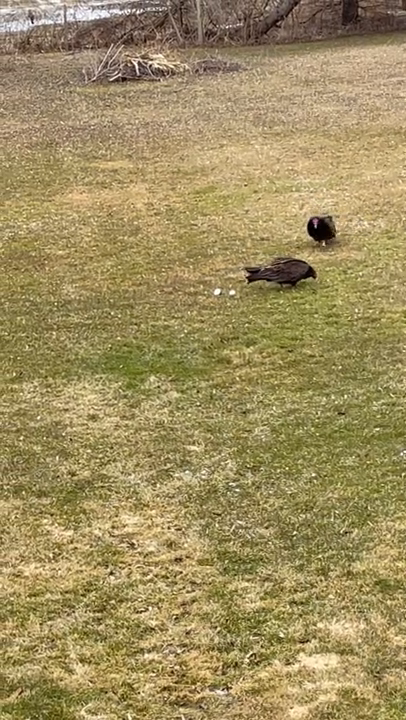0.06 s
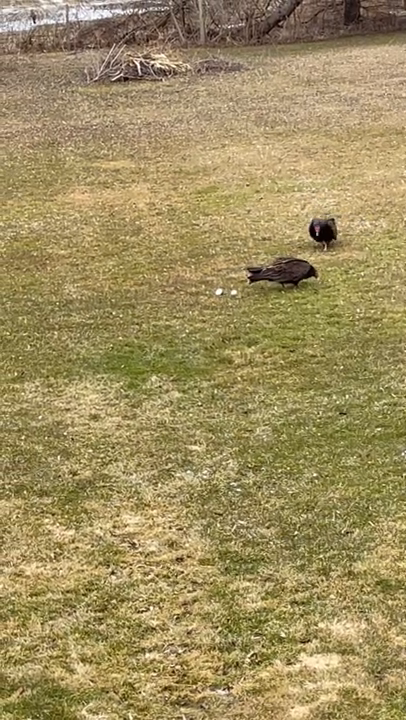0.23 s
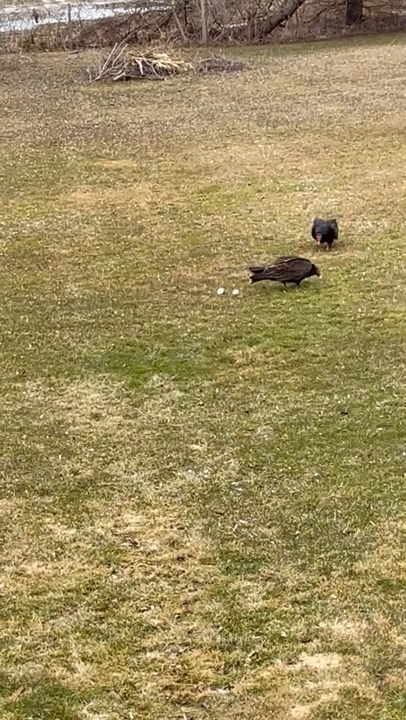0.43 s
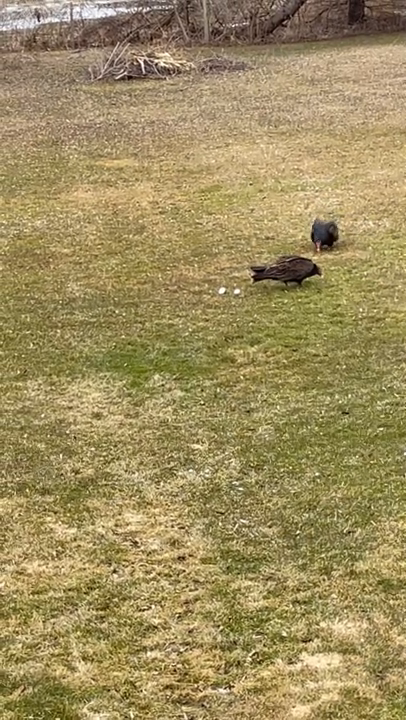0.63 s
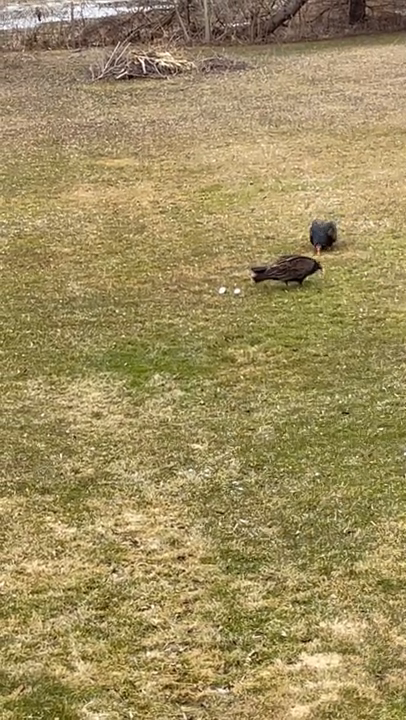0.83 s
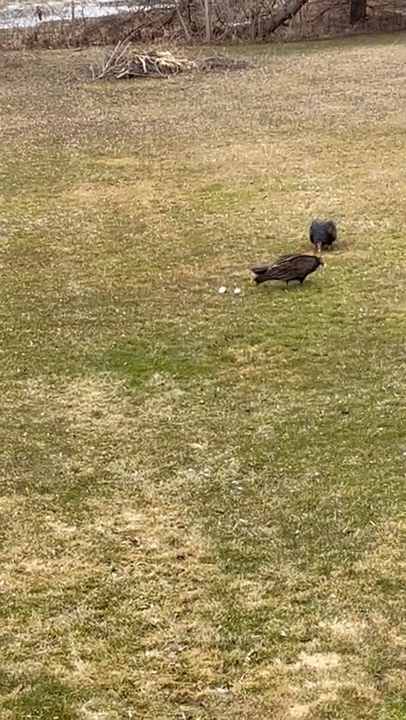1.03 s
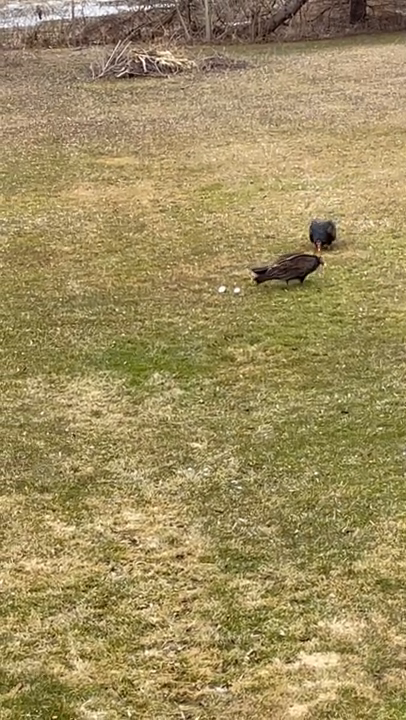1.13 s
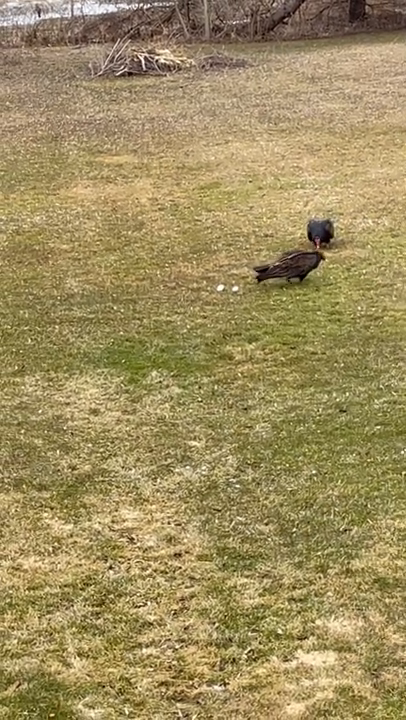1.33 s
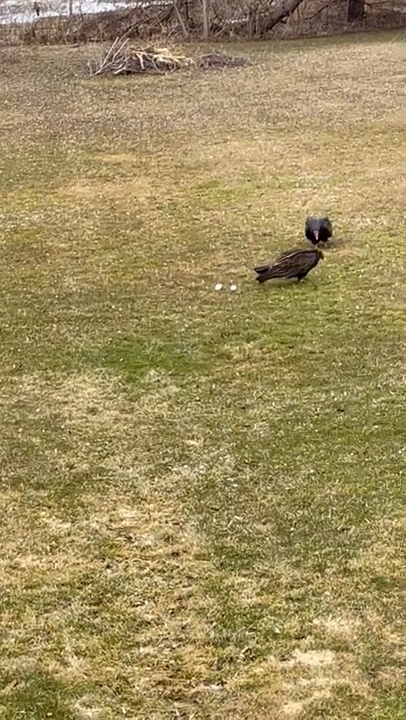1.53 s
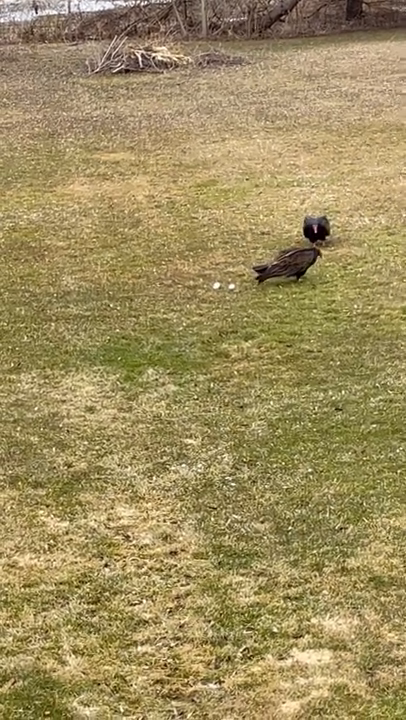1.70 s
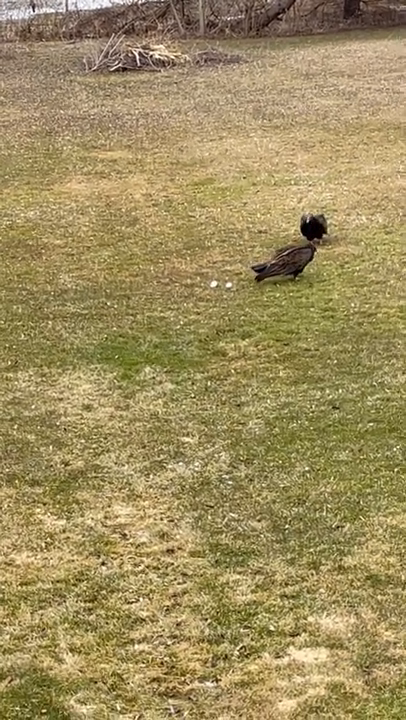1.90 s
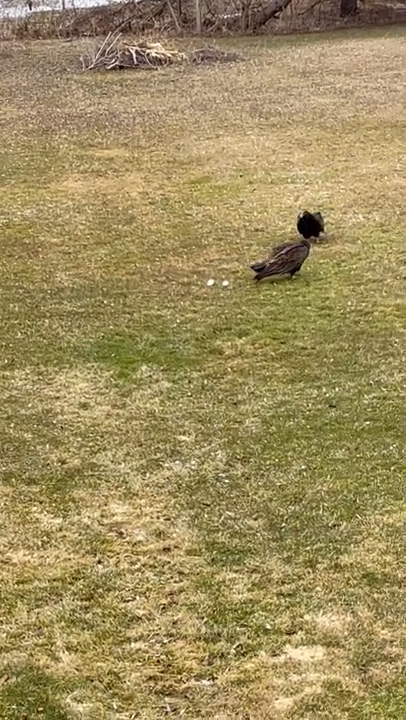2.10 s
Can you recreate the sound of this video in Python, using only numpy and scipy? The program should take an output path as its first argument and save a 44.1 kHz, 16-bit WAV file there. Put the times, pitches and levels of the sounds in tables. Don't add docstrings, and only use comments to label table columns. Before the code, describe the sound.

Wind rumble on a hand-held stereo microphone over an open lawn: light low flutter at first, crowded heavy thumps from 0.4 to 0.9 seconds, strongest near 0.7, fading by 1.1. A soft distant roar of wind in bare trees runs throughout over very faint hiss. Two soft dull taps come at 1.17 and 1.29, with faint cloth rubbing and tiny ticks, the rustle returning from 1.48 to the end.

```python
import sys
import numpy as np
from scipy import signal
from scipy.fft import rfft, irfft, next_fast_len
from scipy.io import wavfile
from scipy.ndimage import uniform_filter1d

SR = 44100
rng = np.random.default_rng(int(sys.argv[2]) if len(sys.argv) > 2 else 0)


def makeup_ratio(level_db):
    decades = np.asarray(level_db, float) / 20
    return 10 ** decades


def dump(signal):
    limited = np.clip(np.atleast_2d(signal).T, -1, 1)
    pcm = np.round(limited * 32767).astype(np.int16)
    wavfile.write(sys.argv[1], SR, pcm)


N = 94815
T = np.arange(N) / SR
CLOTH_SIDE_DB, CLOTH_LINK = 0, .9j


def evened(x):
    return x / np.sqrt(np.mean(x ** 2) + 1e-30)


def curve(points):
    s, db = np.transpose(points)
    return makeup_ratio(np.interp(T, s, db))


def colour(x, points, turn=1):
    f, db = np.transpose(points)
    size = next_fast_len(len(x))
    hz = np.fft.rfftfreq(size, 1 / SR)
    gain = makeup_ratio(np.interp(np.log(hz + 1), np.log(f + 1), db, -150, -150))
    return irfft(rfft(x, size) * turn * evened(gain), size)[:len(x)]


def wander(per_s):
    return evened(signal.lfilter(*signal.butter(2, per_s, fs=SR), rng.standard_normal(N)))


def patchy(patch_db, wide_bins, long_frames, fold_db=0):
    # start_s, centre_hz
    fold = [
        (0.999, 8500),
        (1.122, 4300),
        (1.24, 4100),
        (1.33, 6930),
        (1.5, 7430),
        (1.72, 7330),
        (1.84, 5000),
        (1.96, 5250),
        (2.15, 5850),
    ]
    fold_octaves, hop = .2, 128
    a, b, c, d, patch = rng.standard_normal((N // hop + 5, 257, 5)).T
    patch = uniform_filter1d(patch, size=wide_bins, axis=0)
    patch = evened(uniform_filter1d(patch, size=long_frames, axis=1))
    centre_hz = np.interp(np.arange(patch.shape[1]) * hop / SR, *np.transpose(fold))
    bin_hz = np.fft.rfftfreq(512, 1 / SR)[:, None]
    off = np.log2((bin_hz + 1) / centre_hz) / fold_octaves
    gain = makeup_ratio(patch_db * patch + fold_db * np.exp(-.5 * off ** 2))
    spectra = np.array([a + 1j * b, c + 1j * d]) * gain
    return evened(signal.istft(spectra, nperseg=512, noverlap=512 - hop)[1][:, :N])


def ports(pair, mid_tone, side_tone, side_db, link):
    free = np.sqrt(1 - abs(link) ** 2)
    side = colour(pair[0], side_tone, link) + free * colour(pair[1], side_tone)
    return np.array([colour(pair[0], mid_tone), makeup_ratio(side_db) * side])


def eddies():
    # start_s (top of the swing, about a turn after the kink), peak_db, pitch_hz, push_pull (1 push, -1
    hits = [(.065, -36, 73.4, 1), (0.116, -36, 68.4, 1), (.174, -37.5, 75, -1), (0.217, -31, 62, 1),
            (0.234, -33, 87, 1), (0.288, -38.5, 85.6, 1), (0.32, -40.5, 87.4, 1), (.372, -32, 72.3, 1),
            (0.394, -36, 270, 1), (0.41, -24, 82, -1), (.434, -28, 68, -1), (0.46, -26, 80, 1),
            (0.476, -31, 64.7, 1), (0.502, -25, 98.3, -1), (0.53, -31, 70.5, -1), (0.582, -21.5, 68.4, 1),
            (.612, -29.5, 65.2, -1), (0.644, -23, 87, 1), (0.674, -26.5, 69.5, -1), (0.693, -23.5, 98.5, 1),
            (0.7002, -24.5, 192, 1), (0.706, -15, 106.7, 1), (.728, -27, 62.3, -1), (0.772, -30.5, 83.3, 1),
            (0.788, -21, 95.6, -1), (.809, -26, 77, 1), (0.83, -25.5, 67, -1), (0.884, -39, 86, -1),
            (0.924, -31, 110.7, -1), (0.936, -28, 83.3, -1), (0.975, -27.5, 93, 1), (1.014, -38, 71, 1),
            (1.03, -31, 81, 1), (1.085, -36, 91, 1), (1.175, -35.5, 292, -1), (1.253, -33.5, 85, -1),
            (1.266, -34, 98, -1), (1.295, -37.5, 128, 1), (1.317, -39, 106, 1), (1.582, -38.5, 240, 1),
            (1.671, -32.5, 107.5, -1), (1.733, -37, 210, 1), (1.781, -39, 113, 1), (1.82, -41.5, 115, -1),
            (1.861, -33, 191, -1), (1.883, -30, 134, -1), (2.007, -33, 94, -1), (2.038, -37.5, 88.4, -1),
            (2.13, -37.5, 227, -1), (2.145, -36.5, 129, -1)]
    swing_turns, sag, second_harmonic = .55, .34, .028
    kink_gain, kink_lead_turns, kink_turns = .1, .98, .26
    out = np.zeros(N)
    for start_s, peak_db, pitch_hz, push_pull in hits:
        turns = (T - start_s) * pitch_hz
        phase = 2 * np.pi * (turns - sag * turns * np.clip(turns, -3, 3) / 2)
        swing = np.cos(phase) + second_harmonic * np.cos(2 * phase)
        swing *= np.exp(-.5 * (turns / swing_turns) ** 2)
        kink = np.exp(-.5 * ((turns + kink_lead_turns) / kink_turns) ** 2)
        kink *= np.cos(3 * 2 * np.pi * turns)
        out += push_pull * makeup_ratio(peak_db) * (swing + kink_gain * kink)
    return out


def gusts():
    # start_s, level_db
    gust_level = [(0, -44), (.12, -41), (.15, -45), (.23, -40), (.32, -45), (.4, -37), (.46, -36),
                  (.6, -36), (.73, -35), (.82, -35), (.88, -41), (.95, -34), (1.04, -41), (1.07, -51),
                  (1.25, -46), (1.6, -56), (1.88, -44), (1.95, -55)]
    # freq_hz, density_db
    gust_tone = [(8.8, -52.5), (15, -26), (41, 8), (76, 4), (136, -11), (343, -32.5), (385, -39.5),
                 (450, -55), (580, -63), (990, -120)]
    breeze_tone = [(15, -39.5), (40, -11), (75, 3.5), (141, -4), (254, -7.5), (400, -19.5), (520, -45)]
    gust_side_tone = [(15, -24), (40, -2.5), (75, 2.5), (141, -4.5), (254, -7.5), (400, -17.5), (520, -43)]
    lumps_per_s = 30
    gust, difference, breeze = rng.standard_normal((3, N))
    gust_gain = curve(gust_level) * makeup_ratio(-3.5 + 1.5 * wander(lumps_per_s))
    mid = gust_gain * evened(colour(gust, gust_tone))
    mid += makeup_ratio(-48.5 + 2 * wander(lumps_per_s)) * evened(colour(breeze, breeze_tone))
    mid += eddies()
    heave = np.sqrt(abs(uniform_filter1d(mid ** 2, size=900)))
    side = makeup_ratio(-29.5) * heave * evened(colour(difference, gust_side_tone))
    return np.array([mid, side])


def roar():
    # start_s, level_db
    roar_level = [(0.0, -50.5), (0.22, -50), (0.45, -51), (0.72, -47), (0.9, -50), (0.91, -46.5),
                  (0.99, -49.5), (1.83, -45.5), (2.15, -47.5)]
    # freq_hz, density_db
    roar_mid = [(150, -39.5), (300, -8.5), (450, -7), (750, -2.5), (1100, -8.5), (2200, -27), (3200, -47),
                (5500, -62)]
    roar_side = [(40, -33.5), (320, -10.5), (550, -3), (800, 0.5), (1100, -3), (2100, -26.5), (3300, -34.5),
                 (3500, -76.5)]
    lean, lag_rad = -.58, .4
    pair = patchy(1.5, wide_bins=3, long_frames=25)
    air = ports(pair, roar_mid, roar_side, side_db=-10, link=lean * np.exp(1j * lag_rad))
    return curve(roar_level) * makeup_ratio(-1) * air


def hiss():
    # freq_hz, density_db
    hiss_mid = [(1470, -24), (2500, -8), (3230, -13.5), (8940, -26.5), (10500, -39.5), (16000, -46.5)]
    hiss_side = [(4800, -67), (5100, -1), (8120, -5), (8830, 3), (10600, -4.5), (13000, -15.5),
                 (16000, -26)]
    pair = rng.standard_normal((2, N))
    return makeup_ratio(-87.5) * ports(pair, hiss_mid, hiss_side, side_db=-7, link=.8j)


def ticks():
    # start_s, peak_db, centre_hz, width_octaves
    snaps = [(0.2684, -77.5, 8650, 0.17), (.6716, -68, 4300, 0.57), (.6737, -79.5, 4710, 0.24),
             (0.7154, -70, 4450, 0.24), (0.7156, -63, 12100, 0.53), (.9455, -75, 5550, 0.3),
             (.955, -78, 7000, .3), (.935, -79, 4500, 0.56), (1.0071, -70.5, 9200, 0.14),
             (1.06, -76, 4500, 0.71), (1.1294, -64.5, 8000, 0.69), (1.1394, -65, 8800, 0.17),
             (1.1715, -49.5, 1900, 1.1), (1.176, -65, 7560, .15), (1.184, -58, 6000, .5),
             (1.1894, -56, 10560, 0.25), (1.2446, -57.5, 4750, 0.77), (1.262, -72, 7600, 0.69),
             (1.2888, -59.5, 2510, 0.94), (1.3594, -68, 9100, 0.9), (1.738, -55, 7000, 0.3),
             (1.8324, -54, 6000, 0.47), (1.9036, -54, 5200, 0.37), (1.9042, -60, 14600, .05),
             (1.9385, -56, 11500, 0.17), (1.9395, -49, 5000, 0.4), (2.1356, -42, 15400, 0.25),
             (2.1358, -54.5, 5600, 0.45)]
    # freq_hz, density_db
    tick_mid = [(600, -8), (2500, -4), (5000, -2), (8500, -11), (11500, -19), (15800, -14), (16900, -22)]
    tick_side = [(2000, -30), (4300, -19), (7500, .5), (12000, -7), (15800, -7), (16900, -14)]
    level_db, fizz_s, fizz_gain = 5.5, .0007, .22
    pair = np.zeros((2, N))
    t = np.arange(-64, 192) / SR
    for start_s, peak_db, centre_hz, width_octaves in snaps:
        bell = [(centre_hz * 2. ** (width_octaves * k), -3 * k * k) for k in range(-4, 5)]
        fizz = fizz_gain * rng.standard_normal(256) * (t > 0) * np.exp(-abs(t) / fizz_s)
        snap = colour((t == 0) + fizz, bell)
        at = round(start_s * SR) - 48
        pair[0, at:at + 256] += makeup_ratio(peak_db + level_db) * snap / abs(snap).max()
    return ports(pair, tick_mid, tick_side, CLOTH_SIDE_DB, CLOTH_LINK)


def cloth():
    # start_s, level_db
    rub_level = [(.85, -100), (1.112, -80.5), (1.128, -69), (1.18, -67.5), (1.262, -73.5), (1.278, -85),
                 (1.305, -72.5), (1.36, -79.5), (1.465, -92.5), (1.482, -62), (1.57, -67), (1.62, -80.5),
                 (1.68, -65), (1.75, -66), (1.795, -67.5), (1.9, -61), (2.085, -70.5), (2.15, -60)]
    # freq_hz, density_db
    rub_mid = [(1350, -21.5), (2300, -5), (5180, -4), (8430, -9.5), (11500, -36.5), (14100, -20),
               (15700, -12.5), (15900, -59.5)]
    rub_side = [(3000, -31), (4800, -24), (5100, -9.5), (7670, -0.5), (9000, -4), (12200, -10.5),
                (15700, -9), (15900, -59.5)]
    grains_per_s, grain_db, grain_spread_db = 1500, -8.5, 2.8
    grains = makeup_ratio(grain_spread_db * np.minimum(rng.exponential(1, N), 5))
    grains *= rng.random(N) < grains_per_s / SR
    grains = evened(grains * rng.choice([-1., 1.], N))
    friction = patchy(-.5, wide_bins=9, long_frames=14, fold_db=4) * makeup_ratio(1.15 * wander(45))
    pair = (friction + makeup_ratio(grain_db) * grains) * curve(rub_level) * makeup_ratio(-1.3)
    return ports(pair, rub_mid, rub_side, CLOTH_SIDE_DB, CLOTH_LINK)


def taps():
    # start_s, peak_db, ring_hz, overtone_db
    knocks = [
        (1.1728, -47.5, 312, 6),
        (1.2908, -52.5, 311.4, 13),
    ]
    t60_s, overtone_ratio = .07, 2.6
    out = np.zeros((2, N))
    for start_s, peak_db, ring_hz, overtone_db in knocks:
        t = np.maximum(T - start_s, 0)
        ring = np.sin(2 * np.pi * ring_hz * t)
        ring += makeup_ratio(overtone_db) * np.sin(2 * np.pi * ring_hz * overtone_ratio * t)
        out[0] += makeup_ratio(peak_db - 60 * t / t60_s) * ring
    return out


def scene():
    mid, side = gusts() + roar() + hiss() + ticks() + cloth() + taps()
    return np.array([mid + side, mid - side])


def low_pass(x):
    return signal.sosfilt(signal.butter(12, 16960, fs=SR, output="sos"), x)


def record(dry):
    image_hz, image_db, fade_in_s = 12000, -68, .004
    image = 1 + makeup_ratio(image_db) * np.cos(2 * np.pi * image_hz * T)
    mix = dry * image * np.minimum(T / fade_in_s, 1)
    return low_pass(mix)


dry = scene()
out = record(dry)
dump(out)
```